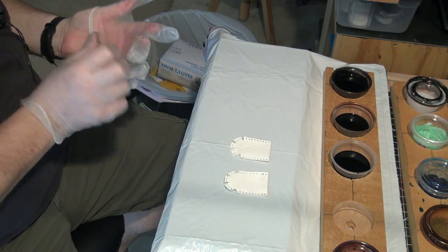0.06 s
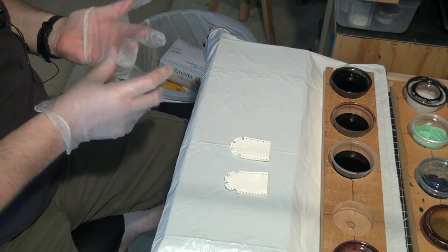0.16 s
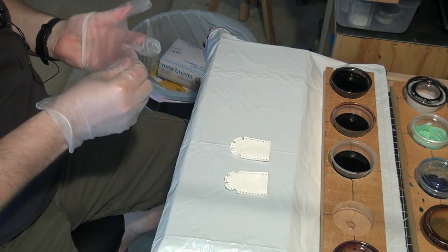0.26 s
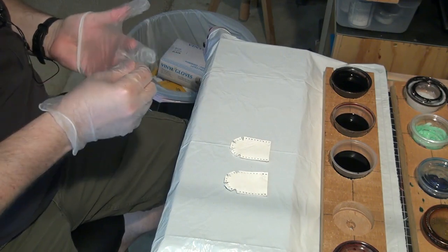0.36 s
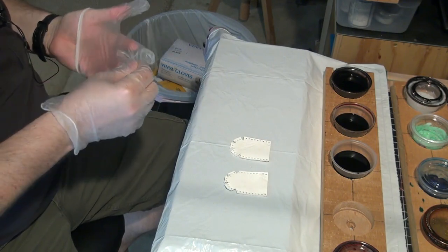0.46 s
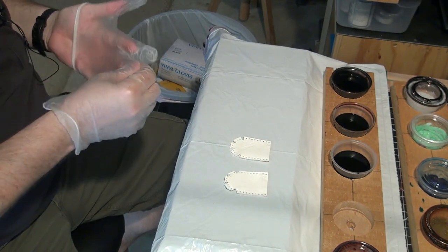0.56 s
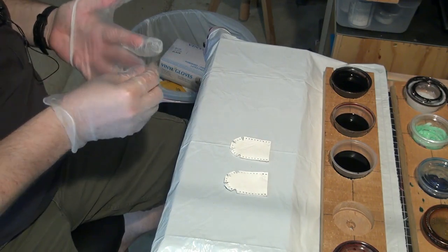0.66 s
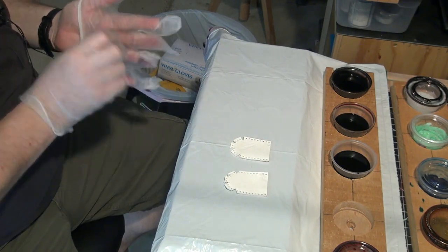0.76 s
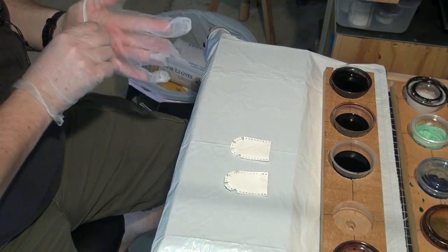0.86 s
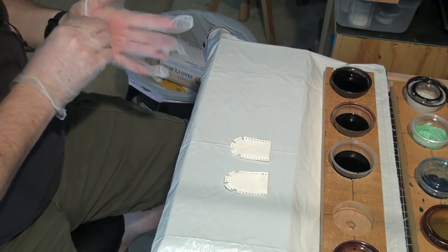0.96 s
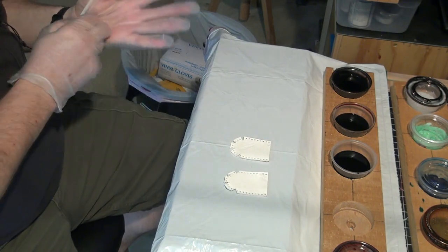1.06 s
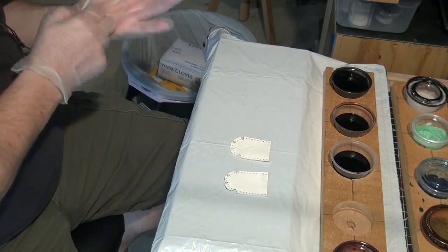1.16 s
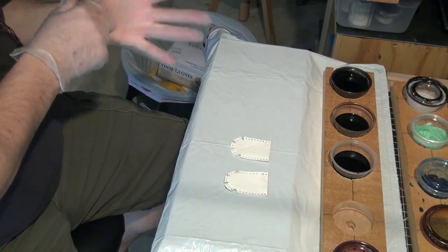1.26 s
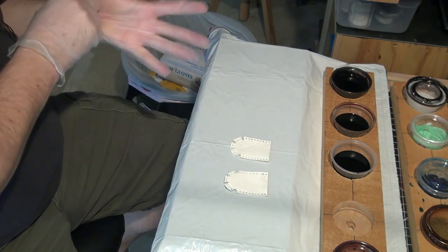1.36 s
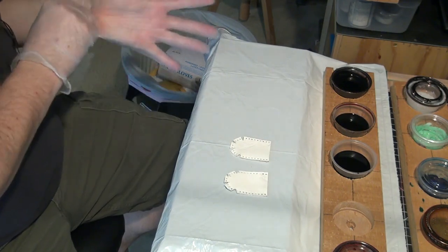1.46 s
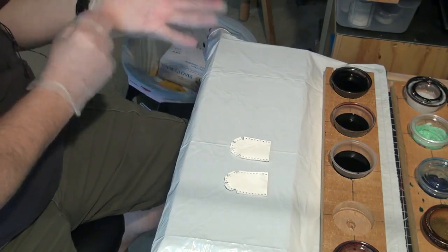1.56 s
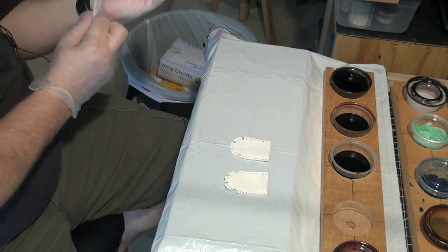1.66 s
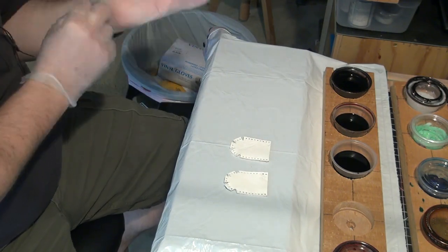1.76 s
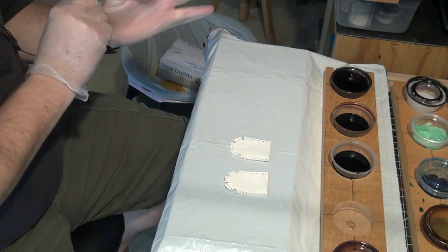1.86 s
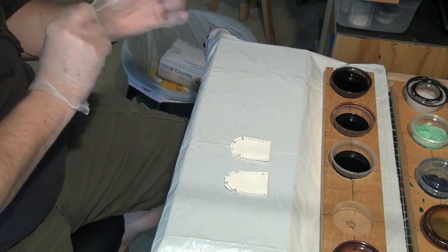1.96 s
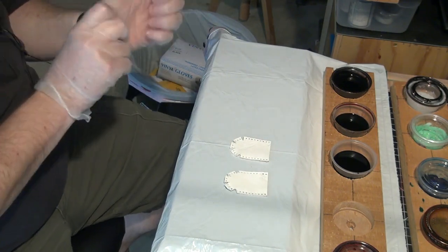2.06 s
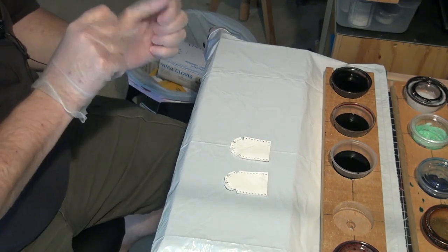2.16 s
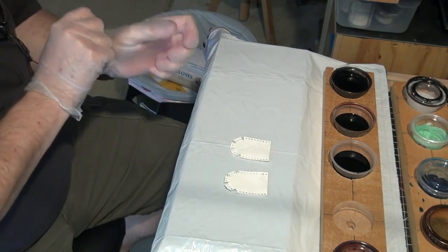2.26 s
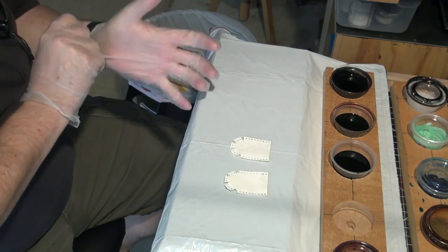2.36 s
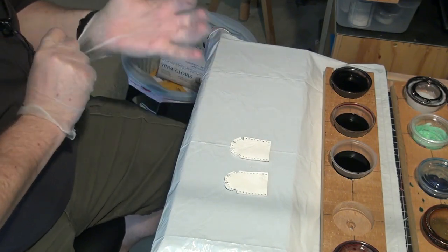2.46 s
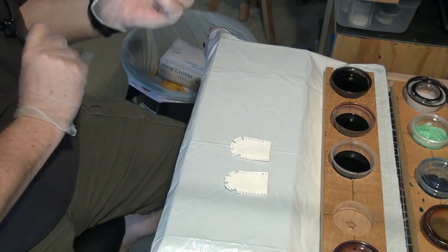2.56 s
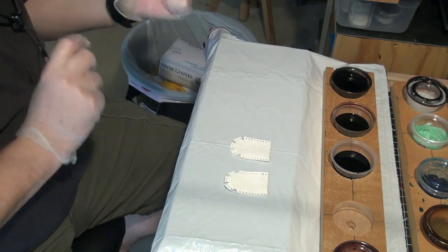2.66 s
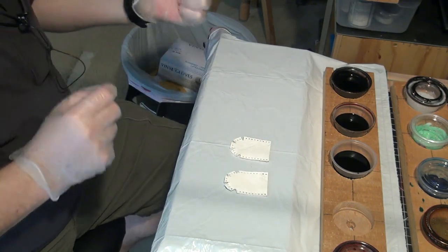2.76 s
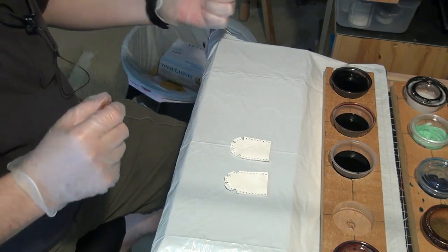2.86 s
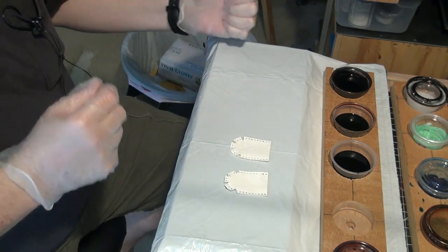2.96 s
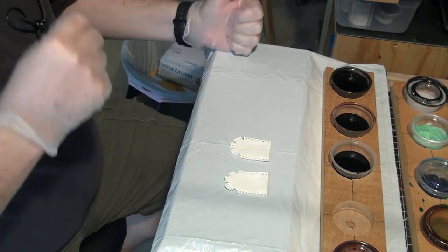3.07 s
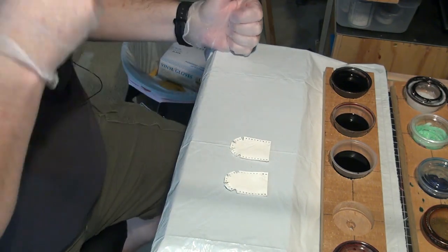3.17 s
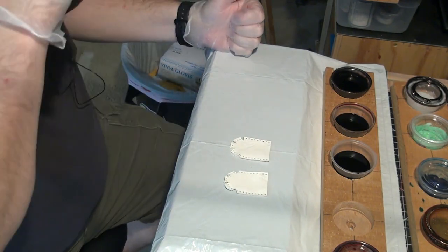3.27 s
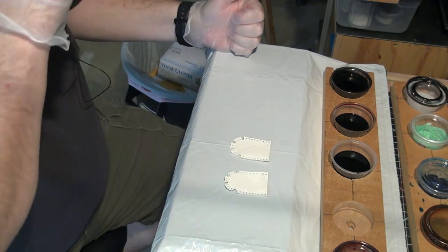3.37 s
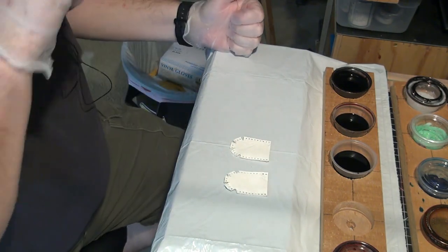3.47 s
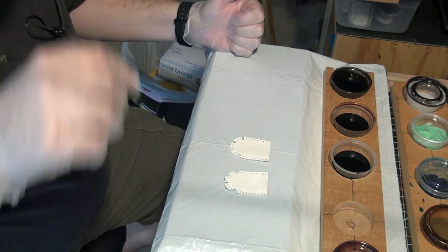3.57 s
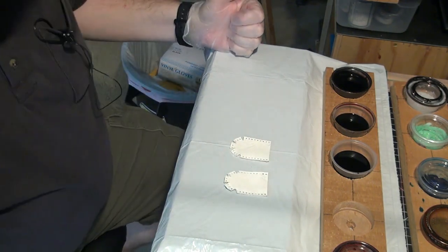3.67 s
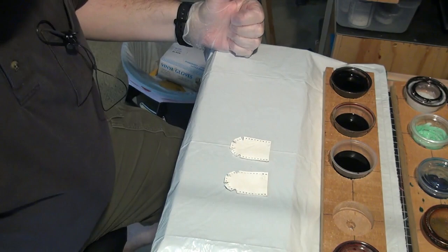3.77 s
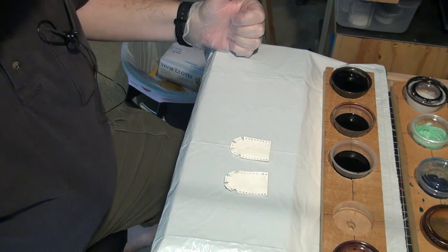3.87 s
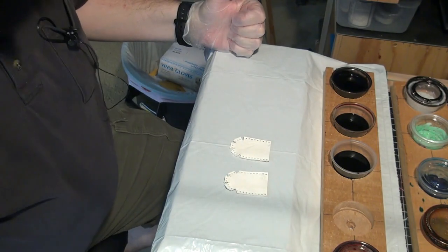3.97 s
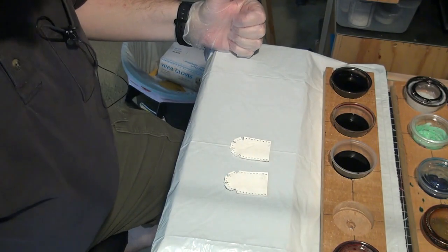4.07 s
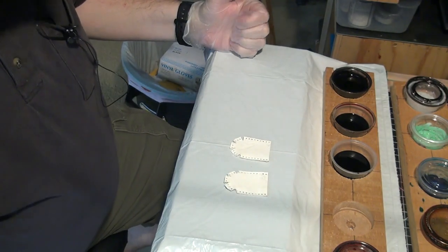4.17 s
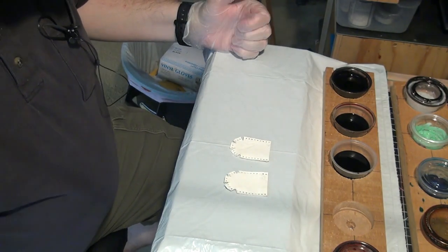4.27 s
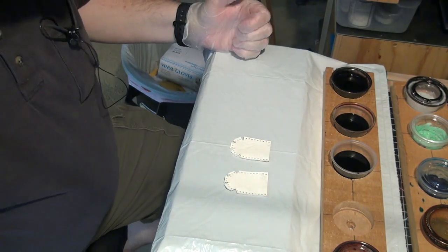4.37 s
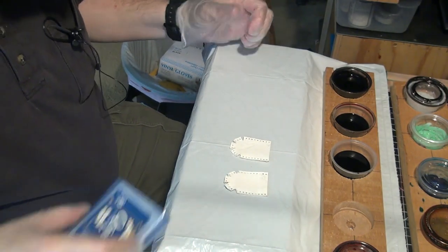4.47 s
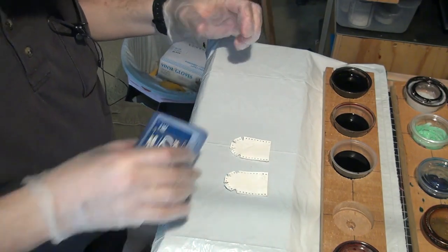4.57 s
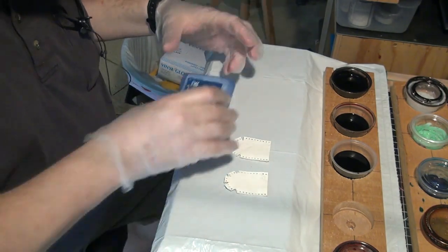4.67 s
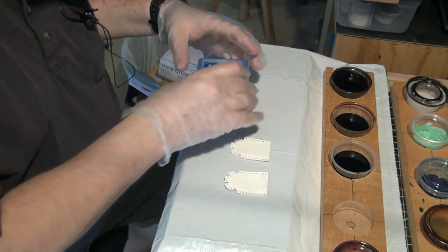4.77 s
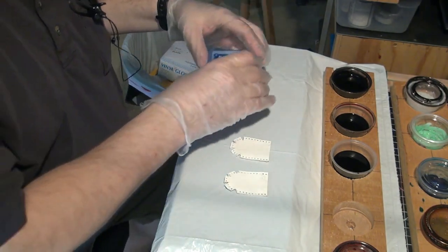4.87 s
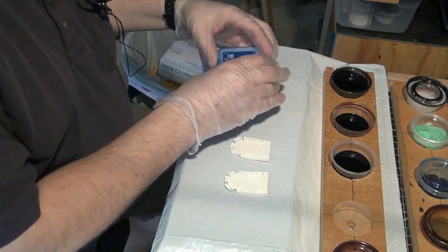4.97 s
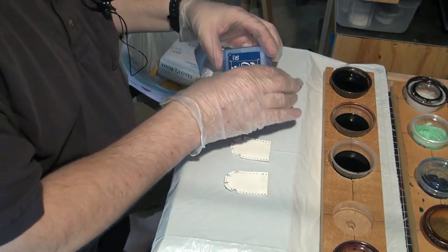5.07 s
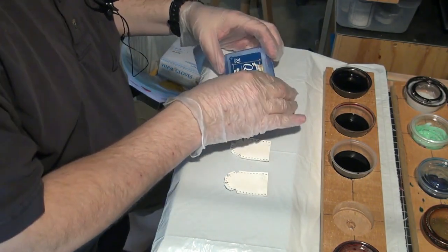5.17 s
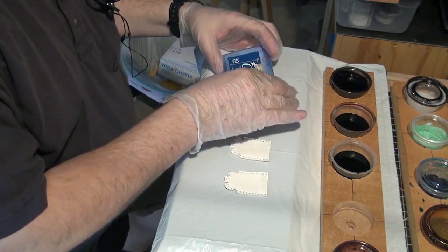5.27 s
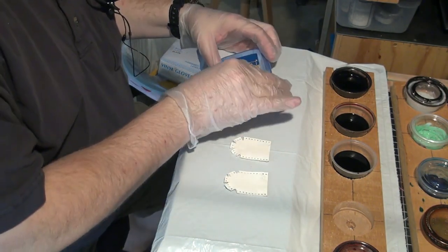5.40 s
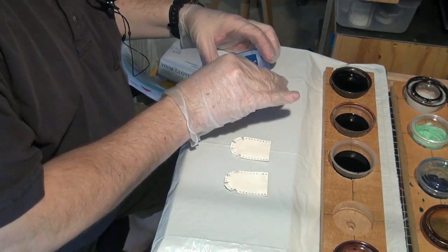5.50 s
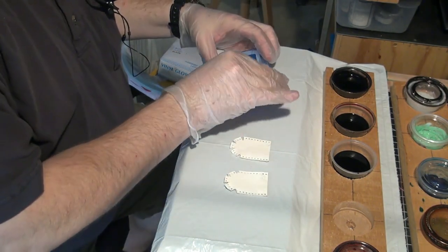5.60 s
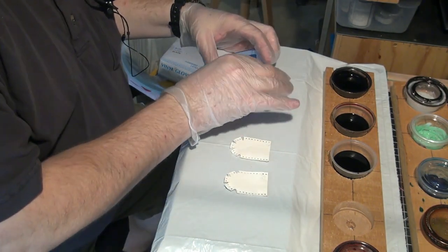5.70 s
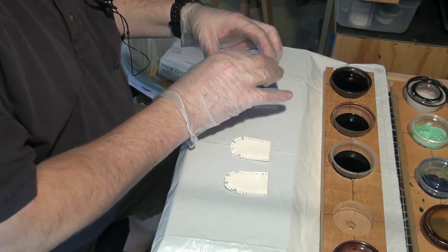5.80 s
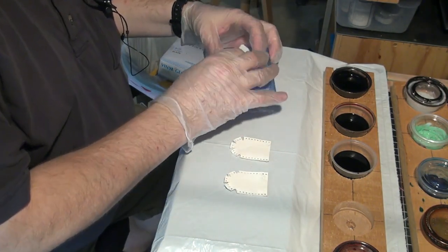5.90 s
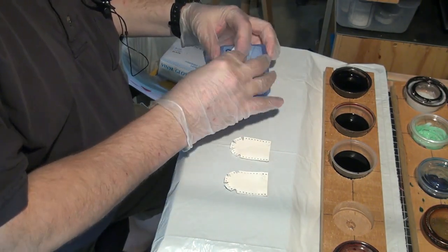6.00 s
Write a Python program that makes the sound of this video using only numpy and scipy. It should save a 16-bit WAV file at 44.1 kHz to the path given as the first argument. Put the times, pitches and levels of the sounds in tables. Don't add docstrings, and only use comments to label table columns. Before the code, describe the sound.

Close up in a small quiet room, thin vinyl film rustles over fingers, pops in dense bursts as it is hauled over the palm, and a stretched cuff snaps sharply. After soft bumps and a near lull, a small hollow carton is gripped, turned and knocked down beside a faintly ringing dish, then its lid creases crack open loudly. Low hiss and hum underneath.

```python
import sys
import numpy as np
from scipy import signal
from scipy.fft import rfft, irfft, next_fast_len
from scipy.io import wavfile
from scipy.ndimage import uniform_filter1d

SR = 44100
rng = np.random.default_rng(int(sys.argv[2]) if len(sys.argv) > 2 else 0)


def unload_wav(signal):
    wavfile.write(
        sys.argv[1],
        SR,
        np.round(np.clip(np.atleast_2d(signal).T, -1, 1) * 32767).astype(np.int16),
    )


def amplitude_ratio(level_db):
    exponent = np.asarray(level_db, float) / 20
    return 10 ** exponent


N = 266364
TIME = np.arange(N) / SR
PORT_SIGNS = np.array([[1], [-1]])


def colour(x, points):
    hz, db = np.transpose(points)
    f = np.fft.rfftfreq(x.shape[-1], 1 / SR) + 1
    gain = amplitude_ratio(np.interp(np.log(f), np.log(hz), db))
    return irfft(rfft(x) * gain, x.shape[-1])


def band(x, lo_hz, hi_hz):
    sos = signal.butter(2, [lo_hz, min(hi_hz, .45 * SR)], "bandpass", fs=SR, output="sos")
    return signal.sosfilt(sos, x)


def unit(x):
    return x / np.sqrt(np.mean(x ** 2))


def walk(rate):
    k = int(SR / rate)
    held = np.repeat(rng.standard_normal(N // k + 1), k)
    return 0.9 * uniform_filter1d(uniform_filter1d(held, k), k)[:N]


# (frequency [Hz], level [dB per Hz])
FILM_SPECTRUM = [(120, -18), (250, -0.5), (590, 0), (1140, -3), (1620, 0.5), (2300, -7), (3900, -5),
                 (6760, -7), (8300, -4), (9800, -10), (13000, -13), (16000, -20)]


def three_bands(x):
    x = colour(x, FILM_SPECTRUM)
    low = colour(x, [(1900, 0), (3200, -60)])
    top = colour(x, [(6000, -60), (9000, 0)])
    return unit(low), unit(x - low - top), unit(top)


# (time [s], effort [dB], depth [dB])
SLIDE = [(0, -45.5, -6.5), (.09, -62, -1), (.24, -59, -2.5), (.5, -52, 2.5), (.72, -51.5, -2),
         (.86, -64, -6.5), (1.17, -45, 1.5), (1.38, -40.5, -5.5), (1.92, -48, -0.5), (2.16, -52.5, -3),
         (2.3, -49.5, -2.5), (2.7, -50, -2.5), (2.82, -59, 0), (3.13, -56, -2), (3.4, -65.5, -2.5),
         (4.38, -63, -5.5), (4.7, -64, -7), (6.04, -62.5, -2.5)]
# (time [s], peak [dB], time to swell by 10 dB [s], depth [dB])
SWISHES = [(.04, -45.5, 0.02, -2.5), (.29, -47.5, 0.011, 0), (.96, -63, 0.36, -10),
           (1.07, -42, 0.0631, -11.5), (1.53, -62, 0.27, -25), (1.838, -33.5, 0.0313, -6.5),
           (1.795, -39, 0.01, 3), (2.085, -54, 0.04, -7), (2.23, -53.5, 0, 4), (2.442, -41.5, .01, -3),
           (2.3, -54.5, 0.04, -2), (2.37, -63, 0.06, -19), (.725, -50, 0, -7), (2.51, -51, 0.12, -23),
           (3.78, -52.5, 0.01, -18), (4.095, -62, -0.2, 0), (4.245, -50.5, 0, -17), (4.445, -61, -0.2, -1),
           (4.74, -57, -0.2, -0.5), (5.597, -58, 0.01, -16), (5.775, -40.5, -0.018, -6),
           (5.81, -25.5, 0.0017, 1)]
# (time [s], peak [dB], time to swell by 10 dB [s], depth [dB])
RUBS = [(.375, -66, .04, -1), (2.04, -52.5, 0.027, -0.5), (2.98, -68, 0.072, 4), (3.57, -65, 0.035, -20.5),
        (4.01, -66, 0.023, 2), (4.125, -62, 0.023, 7), (4.3, -54, 0.022, -10), (4.53, -64.5, 0.071, -1),
        (4.635, -65, 0.02, -19), (4.87, -60, 0.12, 14), (4.99, -46, 0.07, -4), (5.146, -42.5, 0.025, 0),
        (5.22, -58, 0.075, 9), (5.43, -63, 0.072, -12), (5.75, -49, 0.013, 5), (5.87, -31, 0.025, 5.5),
        (5.93, -48, 0.039, -2), (5.99, -61, 0.033, 3), (6.039, -53, 0.022, 0.5)]


def effort():
    fade_per_swell = 1.02
    dull_per_depth = 0.11
    slide_top_db, swish_top_db, rub_top_db = -5.5, 1, -9.5
    t = np.arange(0, N, 32) / SR
    s, db, depth = np.transpose(SLIDE)
    moves = [(np.interp(t, s, db), np.interp(t, s, depth), slide_top_db)]
    for table, top_db in ((SWISHES, swish_top_db), (RUBS, rub_top_db)):
        for at, db, swell, depth in table:
            distance = np.maximum(at - t, (t - at) / fade_per_swell) / max(abs(swell), .003)
            moves.append((db - 10 * distance ** 2, depth, top_db))
    gains = 0
    for db, depth, top_db in moves:
        top = db + top_db - dull_per_depth * depth
        gains = gains + np.array([amplitude_ratio(db + depth), amplitude_ratio(db), amplitude_ratio(top)])
    return [np.interp(TIME, t, gain) for gain in gains]


# (frequency [Hz], width [Hz], level [dB])
HOLLOW = [(670, 255, -0.5), (1000, 210, -0.5), (1380, 420, -5), (1880, 390, -7.5)]
# (time [s], level [dB], half length [s])
WIPES = [
    (0.047, -51, 0.0066),
    (0.283, -39, 0.0075),
    (0.732, -41.5, 0.0075),
    (0.97, -39.5, 0.005),
    (2.106, -53, 0.019),
]


def sliding():
    held_s = 4.77
    low_gain, mid_gain, top_gain = effort()
    crease_sizes = amplitude_ratio(3.4 * np.minimum(rng.exponential(size=N), 3.0))
    creases = (rng.random(N) < 1300 / SR) * crease_sizes
    puffs = signal.lfilter([1], [1, -np.exp(-1 / (0.00091 * SR))], creases) * rng.standard_normal(N)
    rub = rng.standard_normal(N) * amplitude_ratio(3.2 * walk(60))
    crisp = np.where(TIME < 2.9, 1, .55)
    parts = []
    for hiss, pops, pops_db in zip(three_bands(rub), three_bands(puffs), (-3, -4, -12)):
        part = amplitude_ratio(-3.5) * hiss + amplitude_ratio(pops_db) * crisp * pops
        parts.append(part * amplitude_ratio(1.13 * walk(30)))
    low, mid, top = parts
    drive = unit(rub) + unit(puffs)
    hollow = unit(sum(amplitude_ratio(db) * band(drive, hz - w / 2, hz + w / 2) for hz, w, db in HOLLOW))
    low = np.where(TIME > held_s, hollow + amplitude_ratio(-20) * low, low)
    top = np.where(TIME > held_s, colour(top, [(9500, 0.5), (13000, -3)]), top)
    flicks = sum(amplitude_ratio(db) * np.exp(-np.abs(TIME - at) / half) for at, db, half in WIPES)
    return low_gain * low + (mid_gain + flicks) * mid + (top_gain + amplitude_ratio(4.0) * flicks) * top


# (time [s], peak [dB], time to swell by 10 dB [ms], frequency [Hz])
POCKETS = [(0.281, -50.5, 9, 1190), (0.36, -56, 60, 1740), (0.47, -55, 30, 1830), (0.54, -50, 30, 1830),
           (0.61, -51, 40, 2100), (0.735, -57, 30, 377), (0.73, -49, 18, 11000), (1.07, -43, 40, 6500),
           (1.24, -49, 32, 3000), (1.31, -48, 25, 1290), (1.375, -44, 40, 3570), (1.17, -46, 28, 1600),
           (1.44, -49, 20, 2490), (1.575, -46, 22, 6500), (1.9, -51, 30, 950), (2.085, -51.5, 18, 1500),
           (2.237, -55, 7, 7000), (2.305, -57, 15, 9000), (2.335, -54, 20, 3600), (2.443, -50, 13, 610),
           (2.443, -45, 12, 1750), (2.5, -46, 20, 6500), (2.7, -53, 42, 1600), (2.995, -54, 14, 1590),
           (3.125, -57, 23, 3620), (4.0, -48.5, 12, 540), (4.245, -58, 48, 10000), (5.03, -51, 22, 1450),
           (5.07, -50.5, 30, 716), (5.97, -46, 30, 960)]


def pockets():
    width = .27
    rub = rng.standard_normal(N) * amplitude_ratio(1.6 * walk(150))
    out = np.zeros(N)
    for at, db, swell_ms, hz in POCKETS:
        near = slice(max(int((at - .2) * SR), 0), int((at + .2) * SR))
        tone = unit(band(rub[near], hz * (1 - width / 2), hz * (1 + width / 2)))
        out[near] += tone * amplitude_ratio(db - 10 * (1000 * (TIME[near] - at) / swell_ms) ** 2)
    return out


def peak(x):
    return x / np.abs(x).max(axis=-1, keepdims=True)


def blows(table, tilt_db, t60, crack_t60, rattle_db, q, overtones, thud_db, kick_db):
    length = 6144
    s, crack_db, body_db, hz = np.transpose(table)[:4, :, None]
    t = np.arange(length) / SR
    f = np.fft.rfftfreq(length, 1 / SR) + 1
    noise = rng.standard_normal((len(table), 2, length))

    def fade(t60):
        return amplitude_ratio(-60 * t / np.clip(t60, .004, .3))

    def ring(centre, q):
        return 1 / (1 + 1j * q * (f / centre - centre / f))

    crack = noise[:, 0] * (1 - np.exp(-t / 0.00034))
    crack = crack * (fade(crack_t60) + amplitude_ratio(rattle_db) * fade(9.1 * crack_t60))
    tilt = amplitude_ratio(tilt_db * np.log2(np.maximum(f / 2500, 1)))
    crack = band(irfft(rfft(crack) * tilt), 3550, 13540)
    shell = ring(hz, q) + amplitude_ratio(thud_db) * ring(630, 0.78)
    for ratio, db in overtones:
        shell = shell + amplitude_ratio(db) * ring(ratio * np.minimum(hz, 700), ratio * q)
    soft = 1 / (1 + 1j * f / 2400) ** 2
    soft = soft / (1 - 1j * 190 / f) ** 2
    push = amplitude_ratio(kick_db + 12.5) * (t == 0) + noise[:, 1] * fade(t60)
    body = irfft(rfft(push) * shell * soft)
    out = np.zeros(N + length)
    for at, sound in zip(s[:, 0], amplitude_ratio(crack_db) * peak(crack) + amplitude_ratio(body_db) * peak(body)):
        out[int(at * SR):int(at * SR) + length] += sound
    return out[:N]


# (time [s], crack [dB], body [dB], body frequency [Hz])
TIPS = [(.339, -37.5, -42, 1582), (.459, -39, -51, 495), (.483, -46, -48, 670), (.499, -34, -31.5, 600),
        (.5235, -24, -27, 544), (.5626, -28, -32, 527), (.594, -32.5, -34.5, 360), (.632, -37, -37, 746),
        (.7766, -33.5, -47, 326), (.807, -44, -56, 306), (1.926, -34, -36, 1170), (1.935, -32, -46, 1211),
        (1.944, -31, -35.5, 925), (2.043, -46, -36.5, 1000), (2.055, -37, -37, 1110), (2.35, -45, -47, 315),
        (2.9776, -44, -36, 1600)]
# (time [s], crack [dB], body [dB], body frequency [Hz])
PULL = [(1.055, -39, -30, 1780), (1.105, -36, -34, 1570), (1.1204, -28, -31.5, 527),
        (1.131, -34, -29, 1580), (1.153, -25, -35.5, 635), (1.169, -34, -32, 1604), (1.177, -32, -30, 1590),
        (1.2037, -28, -35, 656), (1.2246, -23, -33, 721), (1.2665, -27, -35.5, 1070),
        (1.2865, -25.5, -46, 312), (1.3453, -24, -38, 440), (1.537, -29, -38, 1520),
        (1.565, -26, -33, 1500), (1.581, -31, -31, 1200), (1.599, -38, -36, 900), (1.608, -42, -36, 1000),
        (1.619, -30, -35, 1000), (1.695, -32, -35, 1000), (1.305, -33, -33, 1290), (1.37, -36, -32, 1200),
        (1.631, -33, -32, 706), (1.641, -34, -29, 1100), (1.652, -36, -33, 1000), (1.662, -22.5, -26, 1000),
        (1.674, -32, -28, 1000), (1.683, -18.5, -21.5, 1060), (1.71, -29.5, -36, 1500),
        (1.728, -26, -29, 920), (1.7524, -29, -27, 870), (1.8168, -26, -24, 814), (1.8677, -22.5, -39, 823)]
# (time [s], crack [dB], body [dB], body frequency [Hz])
TAUT = [(.131, -42, -53, 726), (.216, -37, -67, 301), (.749, -31, -58, 613), (.91, -30.5, -49, 726),
        (1.217, -31, -37, 667), (1.8303, -11, -23, 850), (1.8335, -9.5, -48, 796), (2.234, -33, -34, 791),
        (2.362, -39, -60, 1560), (2.438, -30, -32, 1765), (2.553, -24, -31.5, 1890),
        (2.7352, -34, -44, 900), (2.7506, -30, -31, 1630), (2.7736, -35, -38, 1400),
        (3.104, -38.5, -49, 1900), (3.244, -46, -60, 400), (3.2685, -41.5, -60, 409),
        (3.3755, -41, -60, 400)]


def folds():
    film = dict(crack_t60=0.01, rattle_db=-16, q=3.8, thud_db=-13.5, kick_db=7.5)
    tips = blows(TIPS, tilt_db=-13.0, t60=0.073, overtones=[(3.3, -1.2)], **film)
    pull = blows(PULL, tilt_db=-9.5, t60=0.034, overtones=[(2.2, -40)], **film)
    taut = blows(TAUT, tilt_db=-2.5, t60=0.054, overtones=[(2.2, -40)], **film)
    return tips + pull + taut


# (frequency [Hz], half length [s], level [dB])
CUFF = [(6330, 0.00073, -4.5), (3980, 0.0021, -29.5), (10600, 0.0012, -11)]


def cuff():
    t = TIME - 1.8348
    return sum(amplitude_ratio(db) * np.exp(-np.abs(t) / half) * np.sin(2 * np.pi * hz * t) for hz, half, db in CUFF)


# (time [s], frequency [Hz], level [dB])
PINGS = [(2.805, 4300, -46), (3.135, 3800, -46), (3.245, 3100, -46), (3.263, 3600, -47),
         (3.329, 3850, -38.5), (3.376, 7900, -34), (3.385, 3100, -46), (3.677, 9000, -47.5),
         (4.0, 8200, -43.5), (4.032, 10500, -49), (4.178, 9500, -47), (.749, 2900, -32.5)]


def pings():
    out = np.zeros(N)
    for at, hz, db in PINGS:
        t = TIME - at
        out += amplitude_ratio(db) * np.exp(-np.abs(t) / 0.00061) * np.sin(2 * np.pi * hz * t)
    return out


# (time [s], crack [dB], body [dB], body frequency [Hz])
SHELF = [(2.877, -56, -39.5, 390), (3.309, -60, -43.5, 565), (3.555, -50, -48.5, 543),
         (3.6267, -45.5, -44.5, 385), (3.7044, -45, -43.5, 580), (3.7332, -56, -35, 352),
         (3.77, -43, -41.5, 530), (3.7878, -39, -34.5, 340), (3.8084, -46, -33.5, 560),
         (3.8218, -42.5, -41, 328), (3.891, -40.5, -49, 576), (2.202, -60, -39, 262),
         (3.924, -59, -45.5, 334), (4.0178, -41, -40, 810), (4.0522, -53.5, -44, 534),
         (4.667, -58, -33.5, 334), (4.684, -39.5, -33.5, 323)]
# (time [s], crack [dB], body [dB], body frequency [Hz])
EDGE = [
    (4.12, -40.5, -41.5, 1000),
    (4.7277, -56, -22.5, 800),
]


def bumps():
    shelf = dict(crack_t60=0.0073, rattle_db=-11, q=6.9, overtones=[(1.7, -36)], thud_db=-61, kick_db=-3)
    shelf_t60 = 48 / np.array(SHELF)[:, 3:]
    return blows(SHELF, tilt_db=-6.5, t60=shelf_t60, **shelf) + blows(EDGE, tilt_db=-24, t60=0.095, **shelf)


# (time [s], crack [dB], body [dB], body frequency [Hz])
GRIP = [(4.796, -31, -17.5, 632), (4.81, -35, -28, 676), (4.8214, -44, -23, 627), (4.8374, -43, -27.5, 680),
        (4.8544, -51, -30.5, 600), (4.8773, -55, -29.5, 615), (4.9033, -52, -33, 624)]
# (time [s], crack [dB], body [dB], body frequency [Hz])
TURN = [(4.929, -40, -35.5, 629), (4.955, -30.5, -24.5, 657), (4.9674, -37, -43, 710),
        (4.9776, -27, -25, 720), (4.9934, -41, -34, 595), (5.005, -29, -23.5, 676), (5.0194, -41, -32, 780),
        (5.049, -49, -35.5, 656), (5.1245, -23, -27.5, 624), (5.1394, -36, -21.5, 687)]
# (time [s], crack [dB], body [dB], body frequency [Hz])
KNOCKS = [
    (2.1974, -45, -24, 770),
    (3.9893, -25.5, -23.5, 660),
    (5.1806, -14.5, -9, 970),
]


def carton():
    overtones = [(2.05, 0.23), (3.1, -2.2)]
    held = dict(crack_t60=0.028, rattle_db=-11.0, q=9.3, overtones=overtones, thud_db=-16.5, kick_db=11)
    grip = blows(GRIP, tilt_db=-23, t60=0.07, **held)
    turn = blows(TURN, tilt_db=-3.5, t60=0.075, **held)
    knocks = blows(KNOCKS, tilt_db=-18.0, t60=0.06, crack_t60=0.013, rattle_db=-20, q=1.5,
                   overtones=[(3.7, 1)], thud_db=-3.0, kick_db=5.5)
    return grip + turn + knocks


# (time [s], crack [dB], body [dB], body frequency [Hz], crack brightness [dB per octave])
LID = [(5.723, -34, -52, 1000, 8), (5.741, -23, -32, 1000, 1), (5.7466, -24.5, -29, 555, 0),
       (5.757, -23, -36, 1297, 2), (5.763, -20, -27, 1350, 2), (5.7653, -10, -28, 1350, 3),
       (5.771, -15, -23, 1000, -1), (5.7876, -8.5, -13.5, 1010, -5), (5.7905, -28, -18, 1400, 0),
       (5.7995, -19, -22, 615, -1), (5.807, -8.5, -14, 620, 1.5), (5.8168, -7, -14, 960, 1.5),
       (5.82, -18, -18.5, 463, -2), (5.837, -15, -16, 524, 6), (5.842, -21, -22, 1000, 6),
       (5.8539, -5.5, -7.5, 610, -2), (5.8552, -15, -11, 970, -5), (5.8615, -20, -11, 1000, 2),
       (5.8686, -9.5, -14, 1370, 2), (5.8831, -7.5, -16, 690, -5), (5.907, -24, -28, 517, 5),
       (5.9179, -5.5, -11, 714, 0), (5.927, -28, -20, 1000, -2), (5.9386, -34, -32, 1070, 0)]


def lid():
    table = np.array(LID)
    t60 = np.where(table[:, :1] < 5.85, .045, .036)
    return blows(LID, tilt_db=table[:, 4:], t60=t60, crack_t60=0.0083, rattle_db=-14.5, q=5.3,
                 overtones=[(1.62, -3.2)], thud_db=-14, kick_db=10.5)


# (frequency [Hz], level [dB], decay by 60 dB [s])
DISH = [(1460, -22, 0.3), (2175, 4, 0.52), (2340, -12, 0.24), (2681, -15, 0.13), (2826, -12, 0.4),
        (4170, -19, 1.2), (6630, -19, 1.1), (8592, -33, 0.55)]


def dish():
    t = np.maximum(TIME - 5.182, 0)
    return sum(amplitude_ratio(-40.5 + db - 60 * t / t60) * np.sin(2 * np.pi * hz * t) for hz, db, t60 in DISH)


# (frequency [Hz], decay by 60 dB [s])
WALLS = [(150, 0.42), (1000, 0.34), (4000, 0.3), (16000, 0.035)]


def room(x):
    t = np.arange(int(.4 * SR)) / SR
    hz, t60 = np.transpose(WALLS)
    mid, side = rng.standard_normal((2, len(t)))
    ports = mid + 0.037 * side * PORT_SIGNS
    tail = 0
    for f in 180 * 2. ** np.arange(7):
        octave_t60 = np.interp(np.log(f), np.log(hz), t60)
        tail = tail + band(ports, f / 2 ** .5, f * 2 ** .5) * amplitude_ratio(-60 * t / octave_t60)
    tail = tail * (1 - np.exp(-t / 0.0021))
    return signal.fftconvolve(x[None], tail / np.sqrt(np.sum(tail ** 2) / 2))[:, :N]


# (frequency [Hz], level [dB per Hz])
HISS = [(20, -8.5), (54, -8), (81, -0.5), (120, 2), (180, -4.5), (250, -8.5), (500, -13), (911, -16.5),
        (3080, -21), (4370, -24.5), (6920, -22.5), (12900, -27), (16000, -27.5)]
# (frequency [Hz], width [Hz], level [dB])
HUM = [(59.3, 27, -69.5), (116.5, 24, -74.5)]
# (time [s], level [dB])
WHINE = [(0, -71), (2.7, -73), (2.9, -64), (3.0, -61.5), (3.08, -66), (3.36, -80), (3.43, -68), (3.55, -76),
         (3.75, -69), (3.84, -59.5), (3.97, -78), (5.2, -75), (5.42, -67), (5.6, -75), (6.04, -82)]


def background():
    mid, side = rng.standard_normal((2, N))
    ports = mid + colour(side, [(300, -13), (2000, -20.0)]) * PORT_SIGNS
    hiss = amplitude_ratio(-54.5) * unit(colour(ports, HISS))
    hum = 0
    for hz, w, db in HUM:
        hum = hum + amplitude_ratio(db + 7.5 * walk(4)) * unit(band(ports, hz - w / 2, hz + w / 2))
    whine_hz = 6850
    whine_db = np.interp(TIME, *np.transpose(WHINE)) + 5.4 * walk(5.7)
    whine = amplitude_ratio(whine_db) * unit(band(mid, whine_hz - 150, whine_hz + 150))
    return hiss + hum + whine


def scene():
    chest_notch = [(7300, 0), (8250, -9), (9200, 1), (10500, 0)]
    hands = colour(sliding() + folds() + pockets(), chest_notch)
    near = hands + bumps() + carton() + lid() + dish()
    return near + cuff() + pings() + amplitude_ratio(-17.0) * room(near) + background()


def low_pass(x):
    return signal.sosfilt(signal.butter(12, 17160, fs=SR, output="sos"), x)


# (frequency [Hz], level [dB])
PORTS = [(100, -22.5), (500, -14.5), (1500, -20.5), (3000, -28.5), (5000, -22.5), (8000, -13.5),
         (11000, -17.5), (13000, -29)]


def record(dry):
    top_hz = 15780
    dry = colour(dry, [(top_hz, 0), (1.015 * top_hz, -45)])
    mid = dry.mean(axis=0)
    turned = signal.hilbert(mid, next_fast_len(N))[:N].imag
    cloth = rng.standard_normal(400) * np.exp(-np.arange(400) / 90)
    scatter = signal.fftconvolve(mid, cloth / np.sqrt(np.sum(cloth ** 2)))[:N]
    left_bass = colour(mid, [(200, -24), (500, -6), (1200, -10), (2000, -30)])
    lean = amplitude_ratio(-3) * turned + amplitude_ratio(-3) * scatter + left_bass
    mix = dry + colour(lean, PORTS) * PORT_SIGNS
    return low_pass(mix)


dry = scene()
out = record(dry)
unload_wav(out)
```